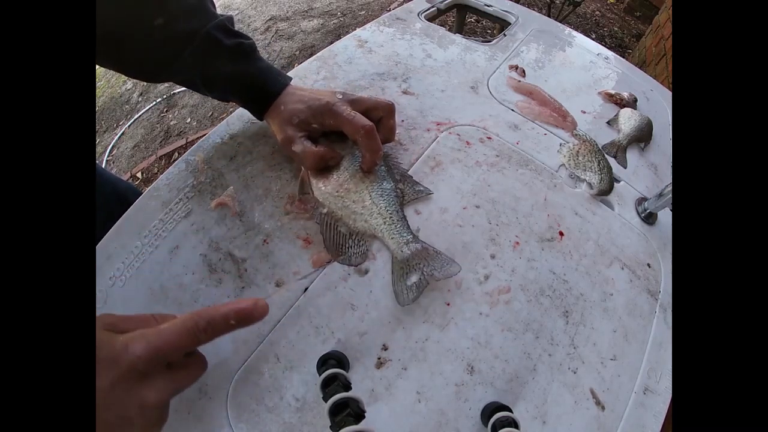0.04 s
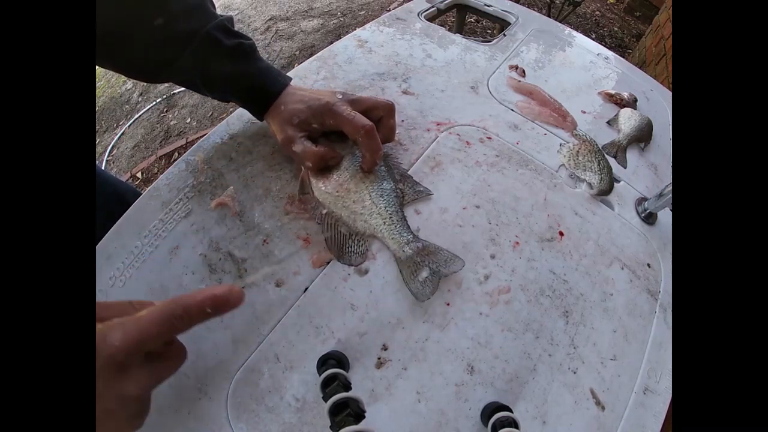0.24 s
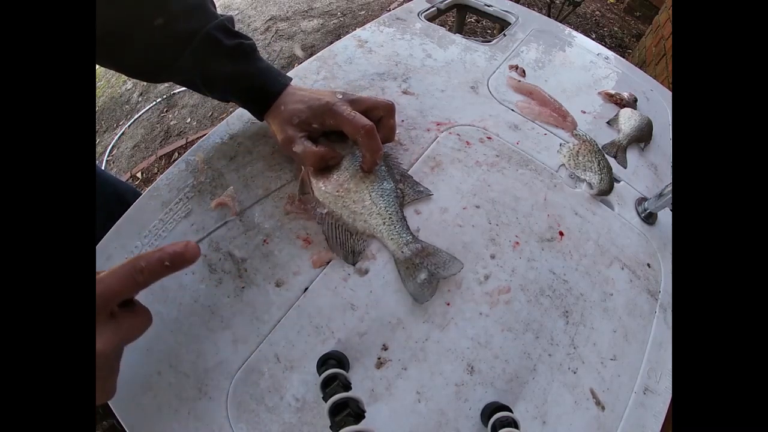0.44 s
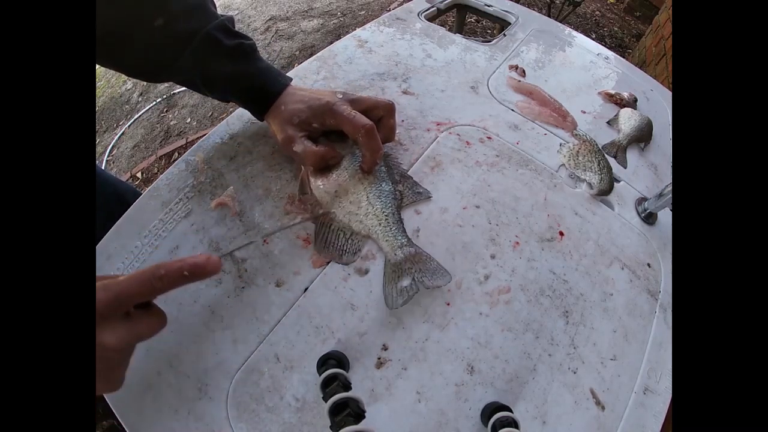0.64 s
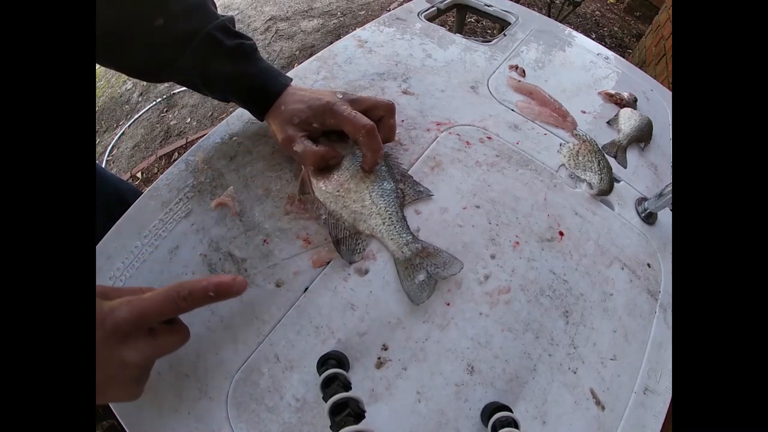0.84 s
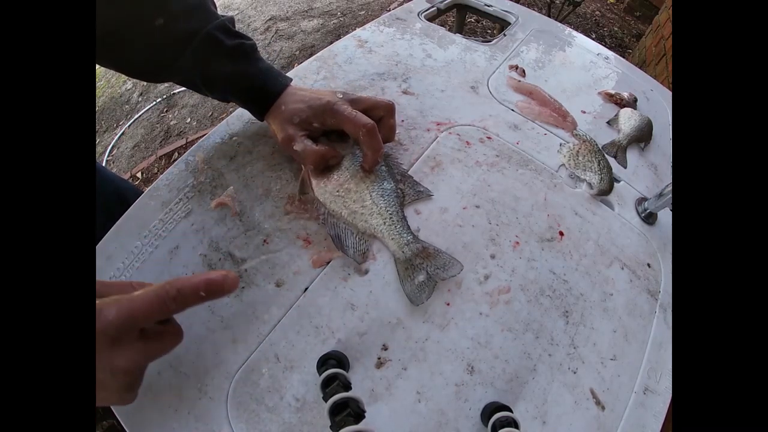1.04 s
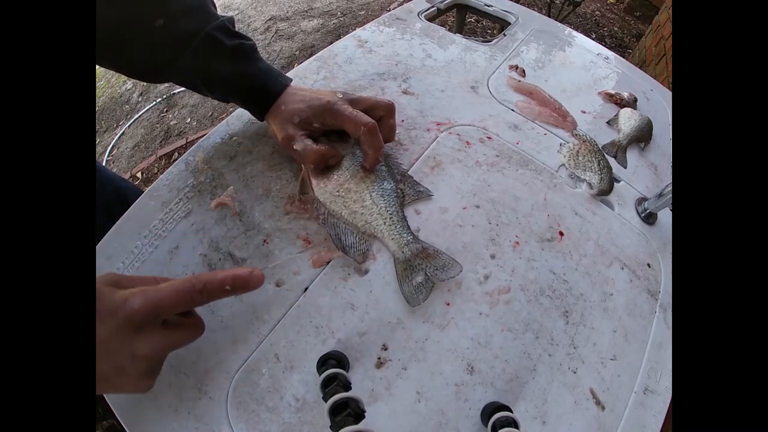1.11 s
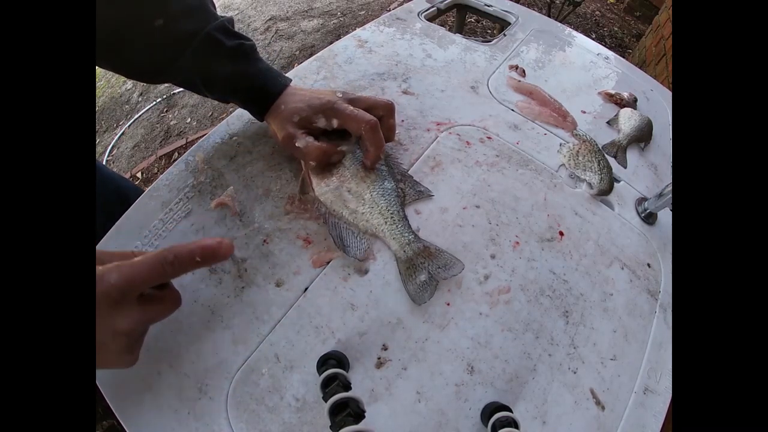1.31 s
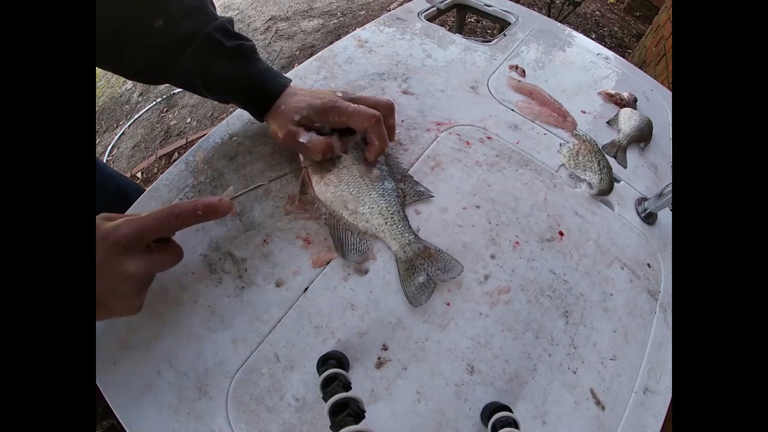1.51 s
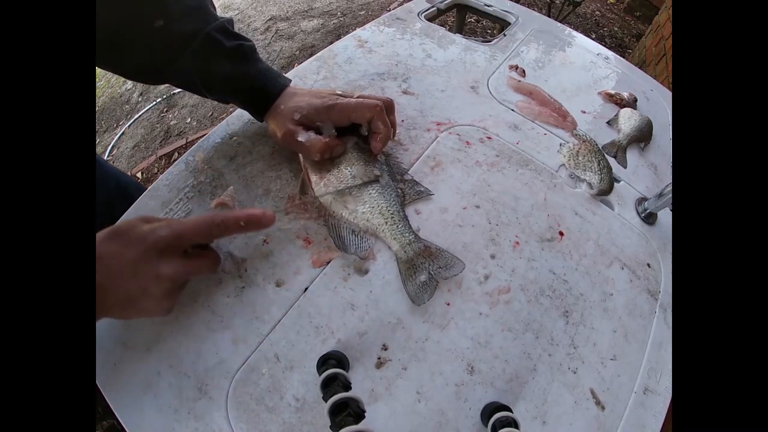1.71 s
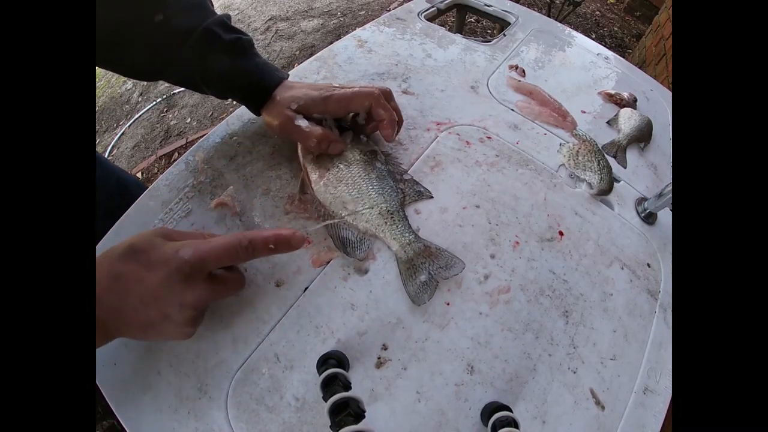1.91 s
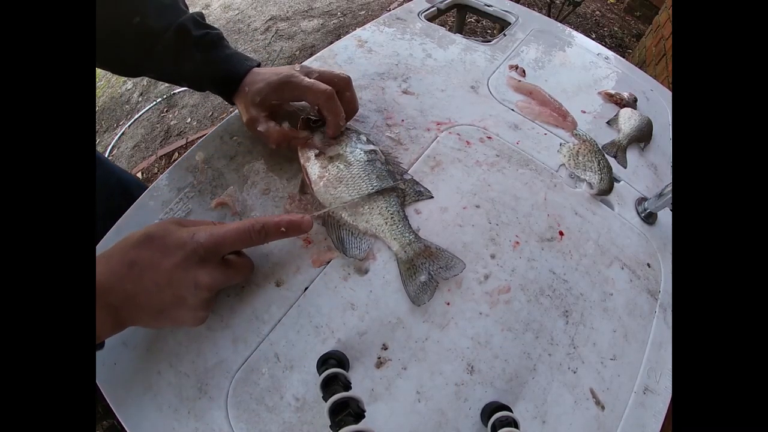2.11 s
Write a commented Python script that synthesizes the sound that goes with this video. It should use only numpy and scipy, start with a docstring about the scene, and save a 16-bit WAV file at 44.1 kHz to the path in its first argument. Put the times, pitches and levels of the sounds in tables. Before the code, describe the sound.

Close up outdoors, a blade rasps over fish scales about four times a second, with crisp snaps, woody clacks and low table rumble, strongest in the first half, over a faint airy background.

```python
"""Faint wind and outdoor hiss, and at once the short rasp of a knife scaling a fish on a plastic table.
Each stroke is a rasp of tiny filtered ticks over a low table rumble; wet skin crackles faintly throughout.
Scales snap loose as spiked noise bursts; the blade knocks as a noise clack plus damped modes.
The hollow table top thuds in damped modes. An echo off the table and a short yard scatter follow."""
import sys
import numpy as np
from scipy import signal
from scipy.fft import rfft, irfft, next_fast_len
from scipy.io import wavfile
from scipy.ndimage import uniform_filter1d, map_coordinates

SR = 44100
rng = np.random.default_rng(int(sys.argv[2]) if len(sys.argv) > 2 else 0)


def pcm_store(signal):
    """Save signal as 16-bit PCM."""
    levels = np.round(np.clip(np.atleast_2d(signal), -1, 1) * 32767)
    wavfile.write(sys.argv[1], SR, levels.astype(np.int16).T)


N = 94815


def amp(db):
    """Decibels to amplitude gain."""
    return 10 ** (np.asarray(db) / 20)


def unit(x):
    """Scale to rms 1."""
    return x / np.sqrt(np.mean(x ** 2) + 1e-20)


def burst(x, size):
    """Scale so that the loudest stretch of size samples has rms 1."""
    power = uniform_filter1d(x ** 2, size, mode="constant")
    return x / np.sqrt(power.max() + 1e-20)


def add(track, start_s, x):
    """Mix x into track from start_s, cut at the end."""
    i = max(round(start_s * SR), 0)
    track[i:i + len(x)] += x[:max(len(track) - i, 0)]


def wobble(knots_per_s):
    """Smooth random curve through normally distributed knots."""
    knots = rng.standard_normal(4096)
    return map_coordinates(knots, [np.arange(N) * knots_per_s / SR], mode="wrap")


def coloured(x, spectrum):
    """Minimum-phase filter with the given (Hz, dB) curve, built through the cepstrum."""
    size = 2 * next_fast_len(len(x) // 2 + 4096)
    hz, db = np.transpose(spectrum)
    bins_hz = np.fft.rfftfreq(size, 1 / SR)
    gain = amp(np.interp(np.log(bins_hz + 1), np.log(hz + 1), db))
    # folding the cepstrum onto positive time makes the filter causal
    cepstrum = irfft(np.log(gain), size)
    cepstrum[1:size // 2] *= 2
    cepstrum[size // 2 + 1:] = 0
    response = np.exp(rfft(cepstrum))
    return irfft(rfft(x, size) * response, size)[:len(x)]


def resonance(x, hz, q):
    """One broad resonant peak."""
    b, a = signal.iirpeak(min(hz, SR / 3), max(q, .8), SR)
    return signal.lfilter(b, a, x)


def ring(modes, attack_s):
    """Sum of damped (Hz, dB, t60 s) modes under a common swell; each level varies randomly."""
    t = np.arange(SR // 3) / SR
    out = np.zeros(len(t))
    for hz, db, t60_s in modes:
        out += amp(db + rng.normal() - 60 * t / t60_s) * np.sin(2 * np.pi * hz * t)
    return out * (1 - np.exp(-(t / attack_s) ** 2))


# Outdoor air spectrum. Each row: frequency in Hz, relative level in dB per Hz.
AIR_SPECTRUM = [(15, -35), (25, -0.5), (133, -7.5), (184, -12.5), (222, -16.5), (342, -12), (392, -27),
                (460, -18.5), (603, -18.5), (654, -20.5), (811, -21.5), (1090, -24), (1510, -28),
                (1820, -32.5), (2520, -33.5), (2730, -36), (3480, -41.5), (3780, -44.5), (6650, -36.5),
                (14200, -57.5), (15800, -78)]
OUTDOORS_DB, GUST_DB, GUST_KNOTS_PER_S = -46, -1, 8.2


def outdoors():
    """Wind and hiss as filtered noise; gusts move only the part below about 120 Hz."""
    air = unit(coloured(rng.standard_normal(N), AIR_SPECTRUM))
    low = signal.sosfilt(signal.butter(1, 120, fs=SR, output="sos"), air)
    gust = amp(GUST_DB * wobble(GUST_KNOTS_PER_S))
    return amp(OUTDOORS_DB) * (air + low * (gust - 1))


TICK_COLOUR_DB = 3.5  # random per tick and band
PATCH_PER_S, PATCH_DB = 110, 6  # neighbouring scales share a colour


def ticks(rate_per_s, scatter_db):
    """Random clicks of random size through parallel resonances whose balance drifts by patch."""
    sizes = amp(scatter_db * np.clip(rng.standard_normal(N), -2, 2))
    hits = (rng.random(N) < rate_per_s / SR) * sizes
    out = np.zeros(N)
    # Each row: centre in Hz, Q.
    bands = [(700, 1), (1500, 3), (2200, 4), (2900, 5), (3700, 6), (4600, 6),
             (5600, 7), (6700, 7), (8100, 6), (9700, 7), (13500, 3)]
    for hz, q in bands:
        tick_db = TICK_COLOUR_DB * np.clip(rng.standard_normal(N), -2, 2)
        patch_db = PATCH_DB * np.clip(wobble(PATCH_PER_S), -2, 2)
        signs = rng.choice([-1, 1], N)
        out += resonance(hits * amp(tick_db + patch_db) * signs, hz, q)
    return unit(out)


# Spectrum applied to ticks of rasp and squish. Each row: frequency in Hz, relative level in dB per Hz.
RASP_SPECTRUM = [(150, -37), (320, -8.5), (520, -2.5), (800, 2), (1000, -0.5), (1250, 2.5), (1480, -4.5),
                 (2250, -2), (3600, -5), (6000, -3.5), (7800, -12.5), (9700, -12), (11500, -25.5),
                 (15500, -27.5)]
SQUISH_PER_S, SQUISH_DB = 200, -69


def squish():
    """Wet skin under the holding hand: sparse faint ticks."""
    return amp(SQUISH_DB) * unit(coloured(ticks(SQUISH_PER_S, scatter_db=6), RASP_SPECTRUM))


def stroke_shape_db(start_s, end_s, rise_s, release_s):
    """Linear rise in dB, hold, linear release; both times are for 20 dB."""
    t = np.arange(N) / SR
    before = np.maximum(start_s - t, 0) / rise_s
    after = np.maximum(t - end_s, 0) / release_s
    return -20 * (before + after)


# Blade strokes and light brushes. Each row: start in seconds, end in seconds, level at start in dB,
# level at end in dB, rise in seconds per 20 dB, treble tilt in dB per octave, table rumble in dB.
BLADE_STROKES = [(0.002, 0.015, -37.5, -47, 0.0083, 1, -40), (0.196, 0.253, -39, -42, 0.025, 1, -42),
                 (0.4497, 0.476, -36, -35.5, 0.0089, 0, -43), (0.719, 0.791, -30, -42, 0.0077, -1.5, -35),
                 (0.826, 0.849, -52, -55, .02, -3.5, -44.5), (0.975, 1.012, -31, -34, 0.0062, 0, -35),
                 (1.028, 1.049, -32.5, -52, .01, 1.5, -39.5), (1.236, 1.256, -50, -47.5, .004, -0.5, -49),
                 (1.261, 1.344, -38, -33.5, 0.021, 2.5, -42), (1.441, 1.481, -55.5, -52.5, .03, -3, -57),
                 (1.548, 1.61, -35, -35.5, 0.0099, 0, -38.5),
                 (1.675, 1.713, -60.5, -53.5, 0.098, -1, -49.5), (1.777, 1.807, -54, -46.5, 0.017, -1, -56),
                 (1.821, 1.847, -42.5, -38, 0.0026, -2, -40), (1.84, 1.868, -74, -49, 0.0089, 6, -39),
                 (1.894, 1.996, -57, -57.5, .02, -0.5, -53.5)]
# Table rumble spectrum. Each row: frequency in Hz, relative level in dB per Hz.
RUMBLE_SPECTRUM = [(25, -5.5), (60, -3.5), (90, -5), (115, -11), (155, -1), (220, -6.5), (330, -12),
                   (480, -24), (1200, -46.5), (5000, -100)]
TICKS_PER_S, TICK_SCATTER_DB = 3600, 4
ROWS_PER_S, ROW_DEPTH_DB = 170, 2.5
RELEASE_S, RUMBLE_RISE_S, RUMBLE_RELEASE_S = 0.018, 0.033, 0.056  # each for 20 dB


def scraping():
    """The edge ticks over rows of scales and drags the table into a low noise rumble."""
    t, out = np.arange(N) / SR, np.zeros(N)
    for start_s, end_s, start_db, end_db, rise_s, tilt, rumble_db in BLADE_STROKES:
        held = (t > start_s - .01) & (t < end_s + .01)
        rows = amp(ROW_DEPTH_DB * wobble(ROWS_PER_S))
        tilted = [(hz, db + tilt * np.log2(hz / 4000)) for hz, db in RASP_SPECTRUM]
        rasp = coloured(ticks(TICKS_PER_S, TICK_SCATTER_DB) * rows, tilted)
        level_db = np.interp(t, [start_s, end_s], [start_db, end_db])
        level_db += stroke_shape_db(start_s, end_s, rise_s, RELEASE_S)
        out += rasp / rasp[held].std() * amp(level_db)

        rumble = coloured(rng.standard_normal(N), RUMBLE_SPECTRUM)
        shape_db = stroke_shape_db(start_s, end_s, RUMBLE_RISE_S, RUMBLE_RELEASE_S)
        out += rumble / rumble[held].std() * amp(rumble_db + shape_db)
    return out


# Scales snapping loose. Each row: time in seconds, level in dB, centre in Hz.
SCALE_SNAPS = [(0.0055, -40.5, 4970), (0.0544, -51, 4370), (0.159, -35, 3280), (0.192, -34.5, 5000),
               (0.212, -33, 5000), (0.244, -35.5, 3800), (0.2468, -31.5, 3200), (0.345, -48, 3440),
               (0.4542, -27.5, 3730), (0.4565, -24, 1980), (0.4595, -23.5, 2670), (0.474, -29.5, 5000),
               (0.48, -29.5, 2270), (0.626, -54, 5050), (0.678, -41, 2570), (0.7182, -25.5, 3540),
               (0.731, -31, 4300), (0.738, -28, 3040), (0.764, -34, 5700), (0.7735, -30, 2880),
               (0.7822, -17.5, 2780), (0.799, -41, 2490), (0.8205, -49, 4500), (0.839, -50, 3000),
               (0.852, -40, 3200), (0.9743, -24.5, 4840), (0.978, -25, 3370), (0.9897, -28.5, 3300),
               (1.008, -28.5, 4100), (1.027, -33, 4470), (1.039, -38, 4900), (1.234, -47.5, 4330),
               (1.2851, -35, 5400), (1.2965, -25, 7800), (1.316, -34.5, 4000), (1.328, -30, 4800),
               (1.331, -32, 3200), (1.3416, -25, 5730), (1.465, -54, 2480), (1.5353, -41, 3240),
               (1.551, -33, 4970), (1.571, -33, 4460), (1.581, -32, 4200), (1.594, -28, 3080),
               (1.608, -50, 4500), (1.794, -47.5, 3500), (1.825, -43.5, 3030), (1.8418, -33.5, 3620),
               (1.8745, -47, 2600), (1.94, -47, 4000)]
# Snap spectrum. Each row: frequency in Hz, relative level in dB per Hz.
SNAP_SPECTRUM = [(200, -6), (900, -12.5), (2300, 3), (6500, -0.5), (8000, -2.5), (9800, -3), (11500, -17.5),
                 (15500, -11)]
SNAP_BUILD_S, SNAP_T60_S = 0.0017, 0.013  # noise rise and decay, each for 60 dB
SNAP_SPIKE, SNAP_Q = 4.1, 1.5


def snaps():
    """A stiff scale bends, creaks and flicks free: rising noise, a spike, decaying crackle, one resonance."""
    out = np.zeros(N)
    t = np.arange(-SR // 300, SR // 20) / SR
    envelope = amp(-60 * np.maximum(t / SNAP_T60_S, -t / SNAP_BUILD_S))
    for snap_s, db, hz in SCALE_SNAPS:
        crack = rng.standard_normal(len(t)) * envelope
        crack[np.argmax(t > .0005)] += SNAP_SPIKE
        crack = coloured(resonance(crack, hz, SNAP_Q), SNAP_SPECTRUM)
        add(out, snap_s + t[0], amp(db) * burst(crack, size=88))
    return out


# Blade knocks. Each row: start in seconds, ring level in dB, dull clack level in dB,
# ring pitch in Hz, upper mode offset in dB.
BLADE_KNOCKS = [(0.014, -43, -53, 1377, -1), (0.16, -41.5, -49, 1330, 7), (0.244, -44.5, -53, 1240, 0),
                (0.4046, -28, -65, 1280, -36), (0.4558, -19, -24.5, 1267, 6.5),
                (0.68, -43.5, -64, 1320, -20), (0.7177, -15, -22.5, 1280, -3), (0.782, -37, -35, 1220, 7),
                (0.94, -45.5, -64, 1265, -20), (0.9761, -26, -33.5, 1260, 7),
                (1.5917, -27.5, -28.5, 1260, -12), (1.63, -48.5, -61, 1270, -13),
                (1.841, -41, -32, 1110, -5)]
# Knife-on-fish modes. Each row: ratio to ring pitch, relative level in dB, t60 in seconds.
BLADE_MODES = [(1, 14, 0.018), (1.06, -9, 0.021), (1.79, -14.5, 0.07), (2.19, -30, .06), (3.02, -32, .06),
               (4.7, -19.5, 0.05)]
# Clack spectrum. Each row: frequency in Hz, relative level in dB per Hz.
CLACK_SPECTRUM = [(120, -18), (350, -6), (550, -6), (800, -2), (1000, -3), (1250, 1), (1500, -6),
                  (1900, -5), (2600, -9), (5000, -26), (12000, -62)]
KNOCK_ATTACK_S, CLACK_T60_S = 0.004, 0.02


def knocks():
    """The blade lands or catches: damped modes plus a dull clack of decaying noise."""
    out, t = np.zeros(N), np.arange(SR // 10) / SR
    for start_s, ring_db, clack_db, pitch_hz, upper_db in BLADE_KNOCKS:
        modes = []
        for ratio, db, t60_s in BLADE_MODES:
            is_upper = ratio > np.sqrt(2)
            modes.append((pitch_hz * ratio, db + upper_db * is_upper, t60_s))
        add(out, start_s, amp(ring_db) * burst(ring(modes, KNOCK_ATTACK_S), size=88))
        noise = rng.standard_normal(len(t)) * amp(-60 * t / CLACK_T60_S)
        clack = coloured(noise, CLACK_SPECTRUM)
        add(out, start_s, amp(clack_db) * burst(clack, size=176))
    return out


# Table thuds. Each row: start in seconds, level in dB.
TABLE_THUDS = [(0.206, -36), (0.402, -38.5), (0.454, -51), (0.68, -29), (0.728, -25), (0.94, -38.5),
               (0.99, -35), (1.342, -38), (1.537, -35), (1.629, -40.5), (1.795, -35), (1.844, -29.5)]
# Table top modes. Each row: frequency in Hz, relative level in dB, t60 in seconds.
TABLE_MODES = [(86.3, -3.5, 0.13), (153.3, 2, .13), (201, -2, 0.079), (273, -19.5, 0.081)]
THUD_ATTACK_S = 0.0042


def thuds():
    """The hollow table top gives under a push and rings in four low damped modes."""
    out = np.zeros(N)
    for start_s, db in TABLE_THUDS:
        add(out, start_s, amp(db) * burst(ring(TABLE_MODES, THUD_ATTACK_S), size=440))
    return out


YARD_T60_S, YARD_BUILD_S, YARD_DB = 0.1, 0.0079, -19.5


def yard(x):
    """Short scatter from things nearby: convolution with swelling, decaying noise of unit energy."""
    t = np.arange(SR // 3) / SR
    tail = rng.standard_normal(len(t)) * amp(-60 * t / YARD_T60_S)
    tail *= 1 - np.exp(-t / YARD_BUILD_S)
    return signal.fftconvolve(x, tail / np.linalg.norm(tail))[:N]


ECHO_S, ECHO_GAIN = 0.0025, 0.26  # snaps off the table top


def scene():
    """All sources centred, with the table echo and yard scatter."""
    cracks = snaps()
    near = squish() + scraping() + cracks + knocks() + thuds()
    add(near, ECHO_S, ECHO_GAIN * cracks)
    mono = outdoors() + near + amp(YARD_DB) * yard(near)
    return np.array([mono, mono])


# Difference between the ports. Each row: frequency in Hz, side over mid in dB before lag and lean.
PORT_SIDE_CURVE = [(1000, -66.5), (2800, -51.5), (5600, -33.5), (9000, -29), (10800, -25), (12000, -6.5),
                   (15000, 2)]
PORT_LAG_S, PORT_LEAN = 0.000307, 0.42  # the lean favours the right
EDGE_HZ, TOP_HZ = 15450, 16000  # treble fades out between these


def record(dry):
    """Two close microphone ports: opposite side signals, mainly in the top treble, and a band limit."""
    size = next_fast_len(N + 8192)
    bins_hz = np.fft.rfftfreq(size, 1 / SR)
    hz, db = np.transpose(PORT_SIDE_CURVE)
    side = amp(np.interp(np.log(bins_hz + 1), np.log(hz), db))
    side = side * (np.exp(-2j * np.pi * bins_hz * PORT_LAG_S) - PORT_LEAN)
    band = np.clip((TOP_HZ - bins_hz) / (TOP_HZ - EDGE_HZ), 0, 1) ** 2
    ports = np.array([1 + side, 1 - side]) * band
    return irfft(rfft(dry, size) * ports, size)[:, :N]


dry = scene()
out = record(dry)
pcm_store(out)
```